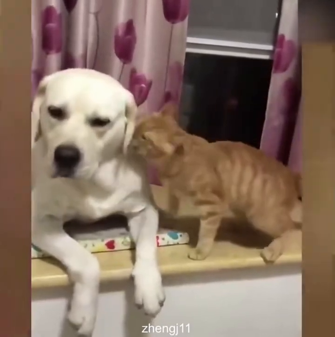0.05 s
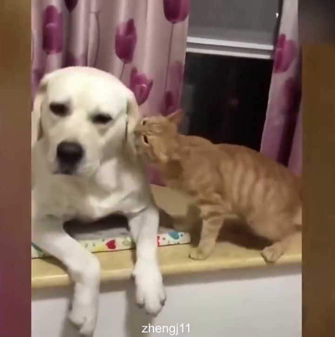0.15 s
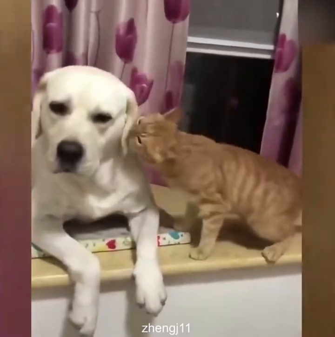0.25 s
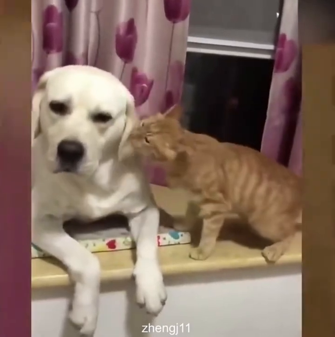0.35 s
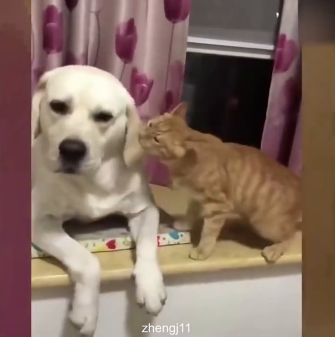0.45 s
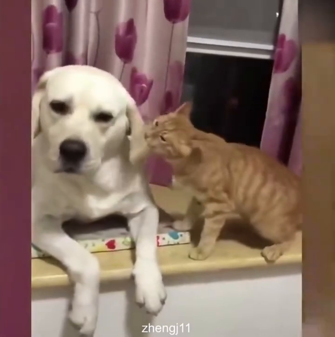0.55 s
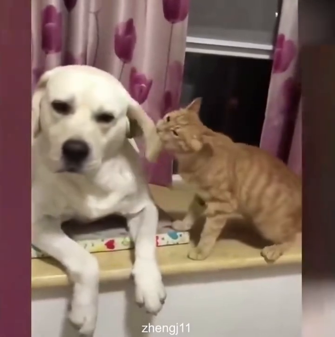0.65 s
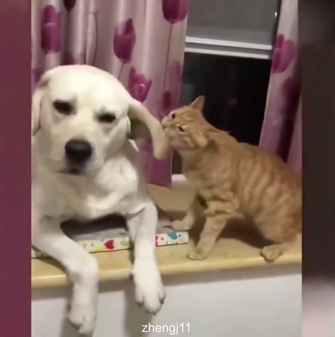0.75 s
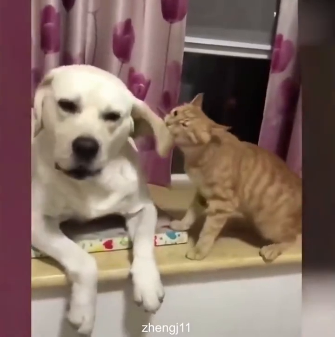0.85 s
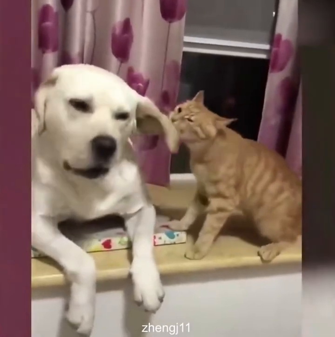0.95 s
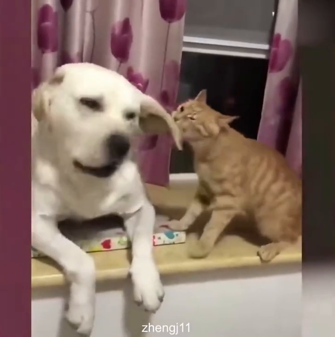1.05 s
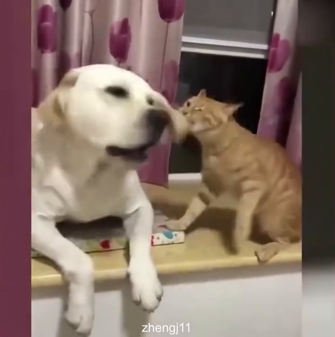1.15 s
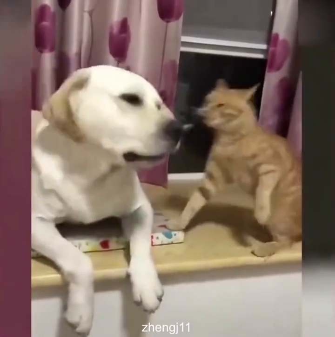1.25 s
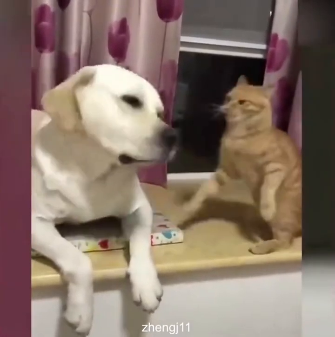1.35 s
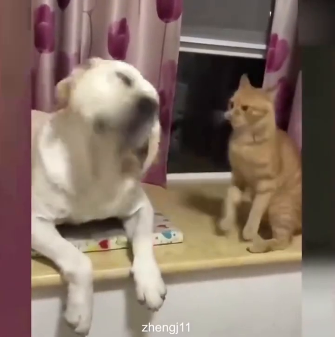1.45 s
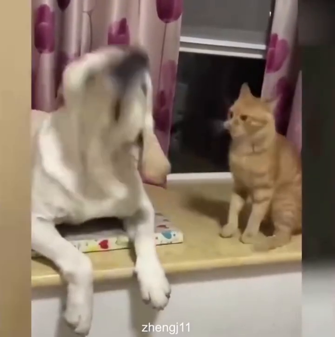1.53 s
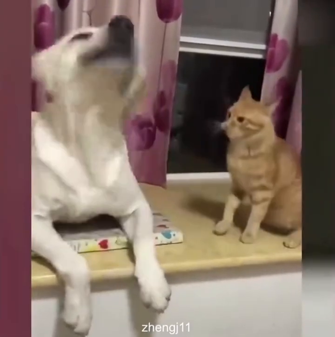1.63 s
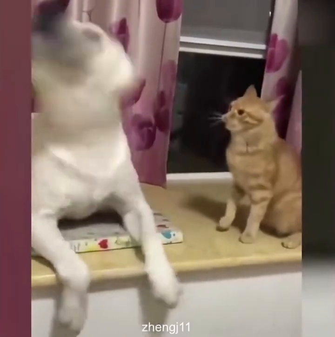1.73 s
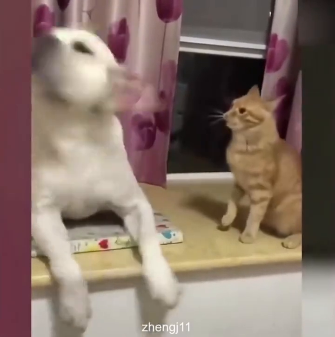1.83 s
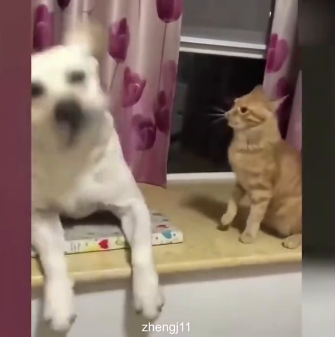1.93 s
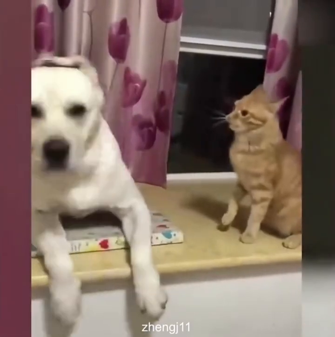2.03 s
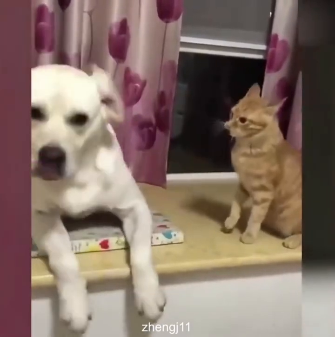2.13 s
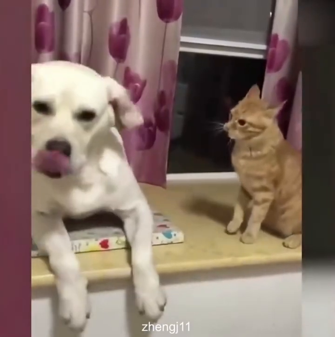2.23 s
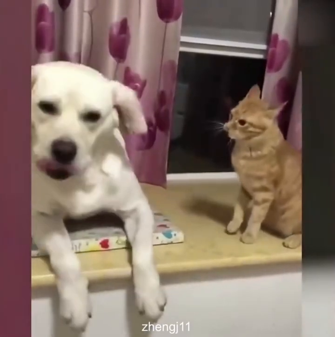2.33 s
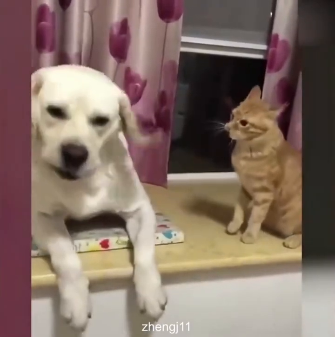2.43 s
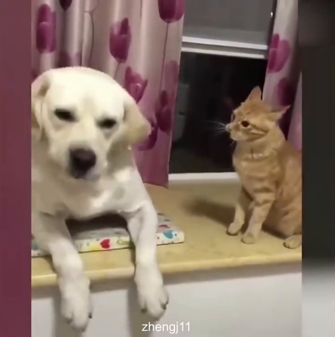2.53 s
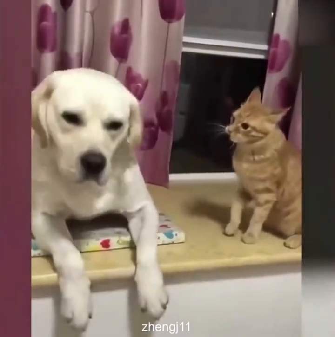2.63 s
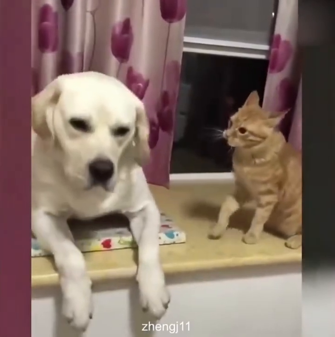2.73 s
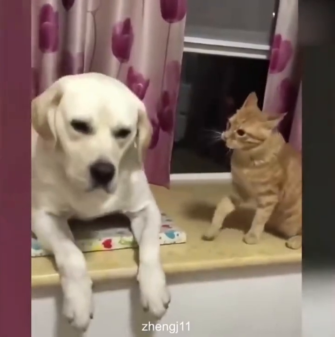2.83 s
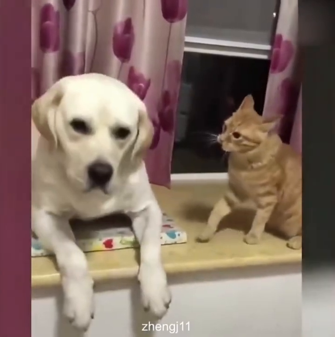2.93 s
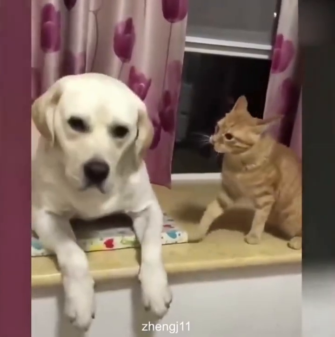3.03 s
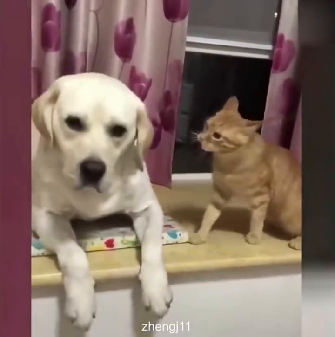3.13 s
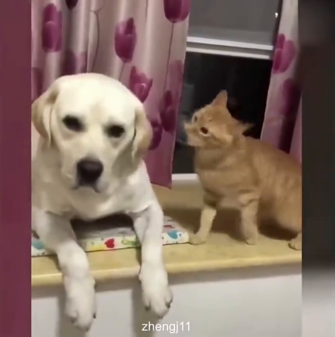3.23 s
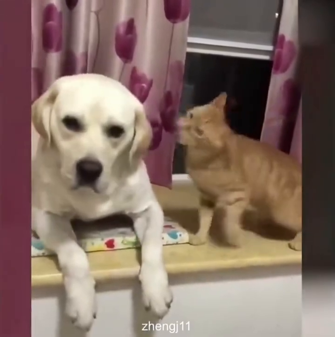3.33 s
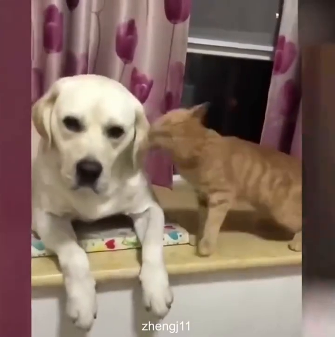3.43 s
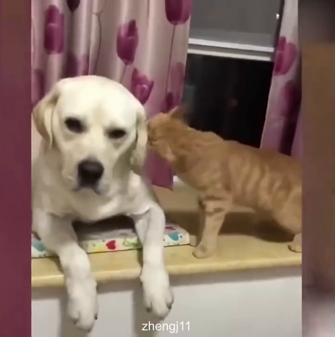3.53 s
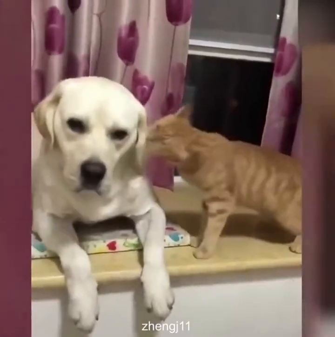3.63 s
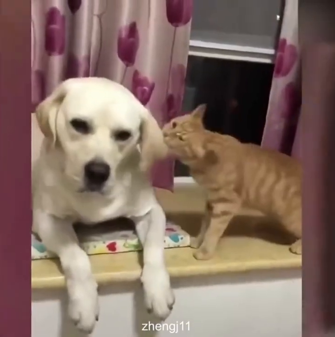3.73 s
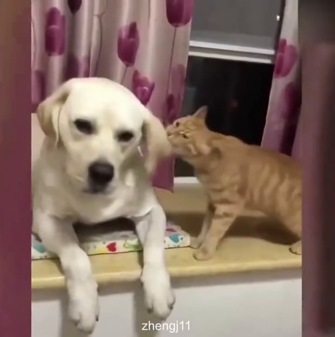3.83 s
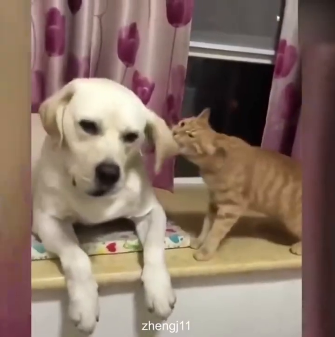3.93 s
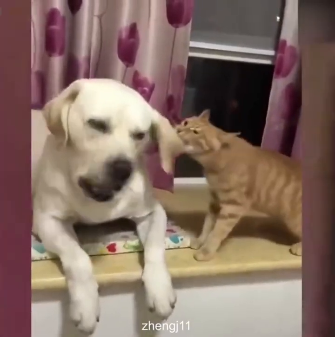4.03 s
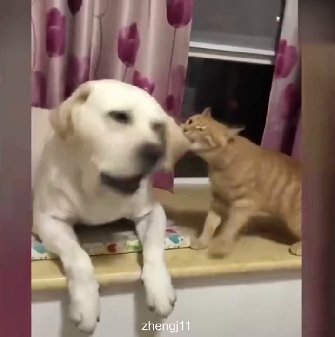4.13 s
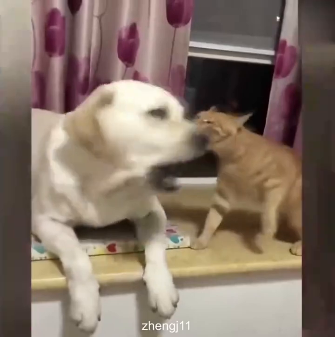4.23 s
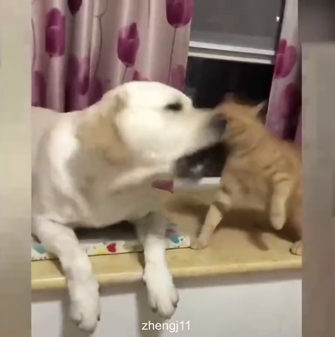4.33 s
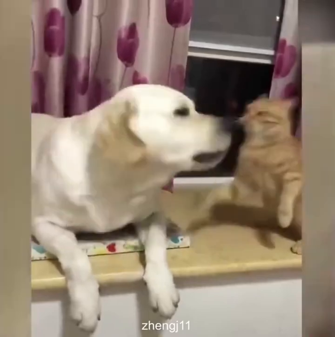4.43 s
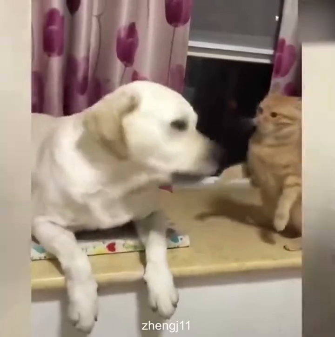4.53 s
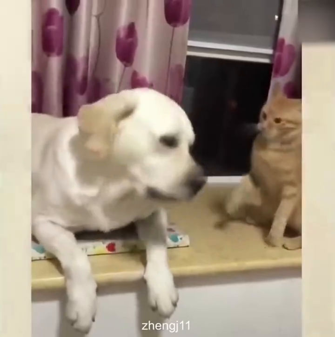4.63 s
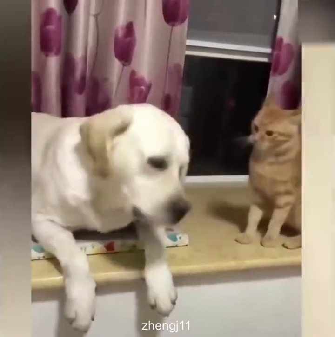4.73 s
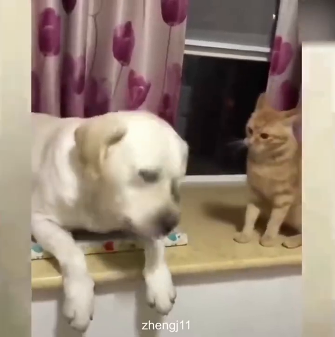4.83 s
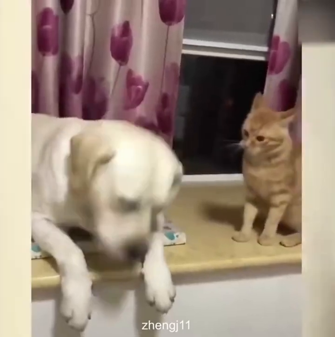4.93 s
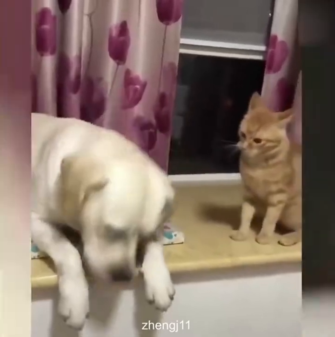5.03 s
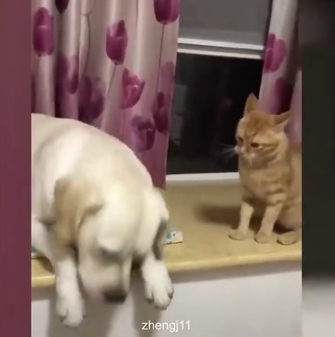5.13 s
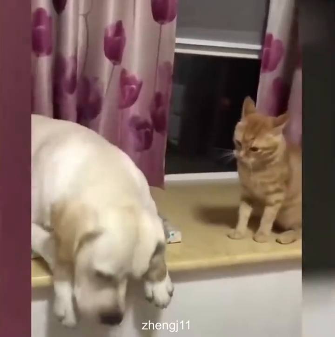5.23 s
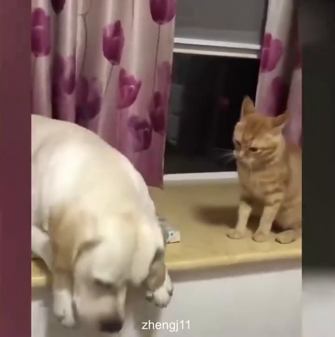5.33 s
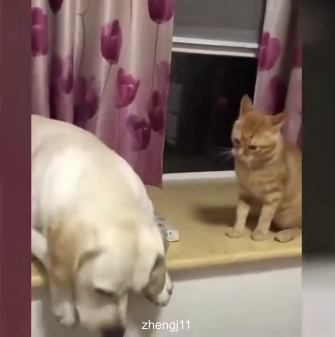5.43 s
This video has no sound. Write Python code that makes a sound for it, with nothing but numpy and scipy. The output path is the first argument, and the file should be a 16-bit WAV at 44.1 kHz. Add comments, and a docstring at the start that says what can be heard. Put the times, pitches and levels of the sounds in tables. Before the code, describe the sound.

In a small reflective room, a dog close to a phone whines with thin high nose whistles, rising into a sharp yelp. A short whine drops to a whimper, then ears and jowls flap softly. After a quiet stretch with faint sniffles, it huffs, gives two loud yelps in quick succession, and ends with a wavering closed-mouth whimper.

```python
"""A small hard-walled room: a dog, pestered by a cat, whines, whistles through its nose and yelps.
Cries stack ragged overtones, half-pitch undertones and breath on a bending pitch; whistles are thin sines.
Between the two outbursts it shakes its head and licks its lips: short bursts of coloured noise.
Sniffles, a huff and room tone are shaped noise; noise echoes make the walls.
A phone close by squeezes the yelps with a fast limiter."""
import sys
import numpy as np
from scipy import signal
from scipy.fft import rfft, irfft, next_fast_len
from scipy.io import wavfile
from scipy.ndimage import uniform_filter1d, minimum_filter1d, map_coordinates

SR = 44100
rng = np.random.default_rng(int(sys.argv[2]) if len(sys.argv) > 2 else 0)


def unload_audio(sound):
    """Save the sound as a 16-bit wav file, at the path given as the first command line argument."""
    columns = np.transpose(np.atleast_2d(sound))
    # keep every value between -1 and 1, then stretch to whole-number steps
    steps = np.round(np.clip(columns, -1, 1) * 32767)
    wavfile.write(sys.argv[1], SR, steps.astype(np.int16))


N = 241578
TOP_HZ = 14000  # nothing sounds above this
PURITY = 0.93  # dB the overtones lose, against the fundamental, per dB of swell

# overtone strength of a cry heard through the nose: (f/Hz, level against the fundamental/dB)
NOSE_TONE = [(500, -9), (1150, -3.5), (1700, -17.5), (2300, -20), (3200, -17), (4100, -20.5), (5100, -20.5),
             (6200, -29.5), (7200, -38.5), (8200, -36), (9600, -43.5), (11000, -37.5), (13500, -42.5)]


def amp(db):
    """Decibels to gain."""
    return 10 ** (np.asarray(db) / 20)


def unit(x):
    """Scaled to rms 1."""
    return x / np.sqrt(np.mean(x ** 2) + 1e-20)


def along(points, hz):
    """(Hz, value) points read on a log frequency axis."""
    f, v = np.transpose(points)
    return np.interp(np.log(hz + 1), np.log(f + 1), v)


def wobble(size, rate):
    """A smooth random curve with rate knots a second."""
    knots = rng.standard_normal(int(size * rate / SR) + 4)
    return map_coordinates(knots, [np.arange(size) * rate / SR])


def filtered(x, response):
    """x shaped by a gain that depends on frequency."""
    size = x.shape[-1]
    padded = next_fast_len(size + 4096)
    spectrum = rfft(x, padded) * response(np.fft.rfftfreq(padded, 1 / SR))
    return irfft(spectrum, padded)[..., :size]


def noise(spectrum, size):
    """Coloured noise of rms 1."""
    return unit(filtered(rng.standard_normal(size), lambda hz: amp(along(spectrum, hz))))


def add(track, s, x):
    """Mix x into the track from time s."""
    part = track[max(round(s * SR), 0):][:len(x)]
    part += x[:len(part)]


def clock(length):
    """The sample times of an event."""
    return np.arange(max(int(length * SR), 8)) / SR


def joined(t, times, values):
    """Straight lines between the stages of an event."""
    return np.interp(t, np.maximum.accumulate(times), values)


def soft_gate(size, fade):
    """Open for size samples, with rounded edges."""
    t = np.arange(size) / SR
    from_edge = np.minimum(t, t[-1] - t)
    return np.sin(np.pi / 2 * np.clip(from_edge / fade, 0, 1)) ** 2


def bend(t, first, middle, last):
    """One smooth scoop or arch of pitch."""
    u = 2 * t / t[-1] - 1
    return middle + (last - first) / 2 * u + ((first + last) / 2 - middle) * u ** 2


def envelope(t, attack, release, edge_db, fade_db):
    """Attack, hold and release in dB, tilted by a steady fade over the whole event."""
    shape_db = joined(t, [0, attack, t[-1] - release, t[-1]], [-edge_db, 0, 0, -edge_db])
    return shape_db - fade_db * (t / t[-1] - .5)


def room_tone():
    """The room's quiet coloured noise: steady, then sinking."""
    # colour of the hush: (f/Hz, relative level/dB)
    hush_color = [(15, -50.5), (25, -14.5), (54, -5), (91, -8), (271, -7.5), (425, -17), (569, -14),
                  (703, -22), (1160, -21.5), (2140, -30.5), (4730, -35), (12300, -41), (14000, -43.5)]
    # loudness of the hush: (t/s, level/dB)
    hush_level = [(4.6, -64.5), (4.75, -70.5)]
    level_db = joined(np.arange(N) / SR, *np.transpose(hush_level))
    return amp(level_db) * noise(hush_color, N)


def whistle(swing, sideband_db=36, octave_db=-31, jitter=0.0036, waver=.005, air_db=-31, flutter_db=2.07):
    """A thin second tone; when the folds swing too they chop it into sidebands, coloured by the nose."""
    # nasal whistles: (start t/s, length t/s, first f/Hz, middle f/Hz, last f/Hz, level/dB, fade/dB)
    whistle_notes = [(0.593, 0.042, 4640, 4630, 4960, -47, -5), (.677, 0.04, 4340, 4210, 4237, -31, -7.5),
                     (0.912, .1, 4154, 4043, 4276, -33, -3), (1.11, 0.021, 4560, 4803, 4680, -40, 2.5),
                     (1.205, 0.061, 4100, 4180, 4110, -32, -2), (1.448, 0.16, 4260, 4378, 4500, -36, 4.5),
                     (1.644, 0.1, 4258, 4150, 4290, -35.5, 0.5),
                     (2.647, 0.066, 4710, 4640, 4554, -44, -2.5),
                     (2.703, 0.14, 4660, 4518, 4574, -48, -2.5), (2.82, .215, 4490, 4486, 4484, -46.5, 7),
                     (4.415, .034, 4660, 4668, 4620, -24.5, 0.5),
                     (4.63, 0.083, 4480, 4477, 4580, -35.5, -7.5),
                     (4.695, 0.09, 4600, 4504, 4355, -39, 5.5),
                     (4.816, 0.11, 4095, 4117, 4070, -45.5, -8.5),
                     (5.425, 0.024, 4230, 4240, 4290, -54.5, -1.5)]
    # hiss around a whistle: (f/Hz, relative level/dB)
    hiss_color = [(1000, -11.5), (3000, 2), (5000, -3.5), (8000, -3), (11000, -9.5), (13500, -25.5)]
    sound = np.zeros(N)
    for start, length, first, middle, last, level_db, fade_db in whistle_notes:
        t = clock(length)
        size = len(t)
        gate = soft_gate(size, fade=.005)
        pitch = bend(t, first, middle, last) * (1 + waver * wobble(size, 45))
        db = level_db + envelope(t, attack=.0075, release=.017, edge_db=11, fade_db=fade_db)
        db = db + flutter_db * wobble(size, 50)
        phase = 2 * np.pi * np.cumsum(pitch * (1 + jitter * wobble(size, 300))) / SR
        tone = np.sin(phase) + amp(octave_db) * np.sin(2 * phase)
        hiss = amp(air_db) * noise(hiss_color, size)
        add(sound, start, np.sqrt(2) * gate * amp(db) * (tone + hiss))
    sidebands = filtered(sound * swing, lambda hz: amp(sideband_db + 2 * along(NOSE_TONE, hz)))
    return sound + sidebands


def voice(calls, tract, shimmer_db, air_db, bite_db, bite_time=0.026):
    """Vocal folds heard through the nose or mouth; also returns the folds' swing."""
    sound, swing = np.zeros(N), np.zeros(N)
    for start, pitch, db, bright_db, half_db in calls:
        size = len(pitch)
        gate = soft_gate(size, fade=.005)
        phase = 2 * np.pi * np.cumsum(pitch * (1 + .005 * wobble(size, 300))) / SR
        # strained folds close a little early or late each cycle, which tears the high overtones into rasp
        slip = np.interp(half_db, [-48, -30], [.08, .16]) * wobble(size, 700)
        # extra edge on the upper overtones, greatest bite_time seconds into the cry
        age = np.arange(size) / SR / bite_time
        bite = bite_db * age ** 2 * np.exp(1 - age ** 2)
        wave = np.sin(phase)
        for k in range(2, 20):
            # each upper overtone swells and fades at random, on its own
            ragged_db = min(2 * k - 3, 5) * wobble(size, 45)
            overtone_db = along(tract, k * pitch) + bright_db + ragged_db + bite * (k > 3)
            overtone = amp(overtone_db) * np.sin(k * phase + (k - 1) * slip)
            wave += overtone * (k * pitch < TOP_HZ)
        # under strain every second cycle differs, which puts lines halfway between the harmonics
        for k in np.arange(10) + .5:
            wave += amp(along(tract, k * pitch) + half_db) * np.sin(k * (phase + slip))
        # air escapes in a puff each cycle
        air = amp(air_db + bright_db) * noise(tract, size) * (1 + np.cos(phase))
        level = amp(db + shimmer_db * wobble(size, 120))
        add(sound, start, gate * level * (np.sqrt(2) * wave + air))
        add(swing, start, gate * np.cos(phase))
    return sound, swing


def short_cry(row):
    """Start, pitch, level, overtones and undertone of one bend of pitch; higher is louder and purer."""
    start, length, first, middle, last, db, fade_db, bright_db, half_db = row
    t = clock(length)
    pitch = bend(t, first, middle, last)
    effort_db = 11 * np.log2(pitch / middle)  # 11 dB an octave
    shape_db = envelope(t, attack=.014, release=.025, edge_db=11.5, fade_db=fade_db)
    return start, pitch, db + effort_db + shape_db, bright_db - PURITY * effort_db, half_db


def long_cry(curve, gain_db, overtones_db, undertone_db):
    """The same controls for a wavering cry, which grows purer as it swells."""
    s, hz, level = np.transpose(curve)
    t = s[0] + clock(s[-1] - s[0])
    db = joined(t, s, level)
    bright_db = overtones_db - PURITY * (db - db.mean())
    return s[0], joined(t, s, hz), db + gain_db, bright_db, undertone_db


def whimpers():
    """Closed-mouth whimpers: two short bends of pitch and one long, wavering cry."""
    # short whimpers: (start t/s, length t/s, first f/Hz, middle f/Hz, last f/Hz,
    #                  level/dB, fade/dB, overtones/dB, half-pitch undertone/dB)
    short_rows = [(0.624, .055, 694, 740.3, 770, -58, 0, 0, -38),
                  (1.742, .068, 762, 605, 456.8, -36, 0.0046, -8, -21)]
    # the long whimper: (t/s, f/Hz, level/dB)
    long_curve = [(4.905, 829, -53), (4.955, 749, -49), (5.0, 670.3, -49), (5.02, 651, -65.5),
                  (5.05, 642.7, -44.5), (5.1, 642, -46.5), (5.16, 636, -33), (5.195, 605, -40.5),
                  (5.23, 579, -63.5)]
    # overtone strength behind closed lips: (f/Hz, level against the fundamental/dB)
    closed_tone = [(500, -3), (1250, -19), (1550, -17), (1950, -27), (2600, -20.5), (3300, -8.5),
                   (3900, -21.5), (4600, -16.5), (6200, -38), (8000, -37), (13000, -40)]
    long_whimper = long_cry(long_curve, gain_db=0.0, overtones_db=-8, undertone_db=-45)
    calls = [*map(short_cry, short_rows), long_whimper]
    return voice(calls, closed_tone, shimmer_db=-0.03, air_db=-29.5, bite_db=1.5)[0]


def whines():
    """Nasal whines, two short and one long and wavering, with the folds' swing."""
    # short whines: (start t/s, length t/s, first f/Hz, middle f/Hz, last f/Hz,
    #                level/dB, fade/dB, overtones/dB, half-pitch undertone/dB)
    short_rows = [(0.706, .205, 750, 559.8, 782.4, -38.5, 6.5, -1, -37.5),
                  (1.394, .17, 1221, 1287, 1214, -30.5, 17, -4, -30)]
    # the long whine: (t/s, f/Hz, level before its gain/dB)
    long_curve = [(1.008, 1122, -33), (1.02, 861, -30.5), (1.037, 820, -31.5), (1.062, 1071, -32),
                  (1.1, 1038, -29), (1.122, 1216, -26), (1.137, 1070, -21), (1.157, 1069, -11.5),
                  (1.177, 1092, -31), (1.21, 1178, -28), (1.265, 1214, -30.5)]
    long_whine = long_cry(long_curve, gain_db=-0.5, overtones_db=0, undertone_db=-30)
    calls = [*map(short_cry, short_rows), long_whine]
    return voice(calls, NOSE_TONE, shimmer_db=2.92, air_db=-32, bite_db=-0.5)


def yelp(row, pitch_curve):
    """The same controls for a yelp: it starts softly, bursts out, holds, then cracks into a weaker end."""
    # level at the start and end of the lead-in: (level/dB, level/dB)
    lead_in_db = (-31.5, -21.5)
    crack_s, release_s, release_db = 0.019, 0.026, 11.5
    sag_db, dulling_db = 3.5, 4  # losses of level and of overtones over the hold
    (start, length, lead_in, attack, crack, full_db, cracked_db,
     burst_bright_db, cracked_bright_db, half_db, rasp_db) = row
    t = clock(length)
    burst, cracked = lead_in + attack, crack + crack_s
    # 72 % of the rise in dB is done halfway through the attack
    halfway_db = lead_in_db[1] + .72 * (full_db - lead_in_db[1])
    times = [0, lead_in, lead_in + attack / 2, burst, crack, cracked, length - release_s, length]
    levels = [*lead_in_db, halfway_db, full_db, full_db - sag_db,
              cracked_db, cracked_db, cracked_db - release_db]
    bright_db = joined(t, [burst, crack, cracked],
                       [burst_bright_db, burst_bright_db - dulling_db, cracked_bright_db])
    # the undertone needs up to 80 ms to build from nearly clean
    undertone_db = joined(t, [0, min(.08, crack), crack, cracked], [-45.5, half_db, half_db, rasp_db])
    pitch = joined(start + t, *np.transpose(pitch_curve))
    return start, pitch, joined(t, times, levels), bright_db, undertone_db


def yelps():
    """Open-mouthed yelps whose pitch dips as the mouth opens and climbs as it closes."""
    # yelps: (start t/s, length t/s, lead-in t/s, attack t/s, crack after t/s, full level/dB, cracked level/dB,
    #         burst overtones/dB, cracked overtones/dB, full undertone/dB, cracked undertone/dB)
    yelp_rows = [(1.262, 0.13, .002, .022, .08, 0.5, -13, 1.5, 5, -42, -32),
                 (4.254, 0.15, .025, 0.0025, .06, 5.5, -11.5, -1, 1.5, -39.5, -25),
                 (4.446, 0.18, .003, 0.035, .128, -3, -16.5, 2, 2, -16.5, -31.5)]
    # one pitch curve a yelp: (t/s, f/Hz)
    pitch_curves = [
        [(1.263, 1024), (1.277, 942.7), (1.297, 902.3), (1.311, 824.8), (1.325, 907.3), (1.342, 885.3),
         (1.36, 1008), (1.4, 1233)],
        [(4.255, 1049), (4.266, 752.5), (4.279, 693), (4.281, 840.4), (4.297, 778.6), (4.316, 845),
         (4.328, 980.3), (4.355, 1093), (4.402, 1200)],
        [(4.448, 1211), (4.473, 1004), (4.488, 994), (4.502, 936.2), (4.56, 920.7), (4.58, 979.4),
         (4.597, 1125), (4.625, 1200)],
    ]
    # overtone strength through the open mouth: (f/Hz, level against the fundamental/dB)
    mouth_tone = [(450, -17), (900, 1.5), (1400, -1), (1850, -9), (2300, -22), (2900, -22), (3700, -35),
                  (4800, -39.5), (5900, -47), (7100, -38), (8300, -38), (9400, -47), (11000, -54.5),
                  (13500, -62)]
    calls = map(yelp, yelp_rows, pitch_curves)
    return voice(calls, mouth_tone, shimmer_db=3.0, air_db=-38.0, bite_db=7.5)[0]


def rumble(yelp_sound, rumble_db):
    """A faint low rumble that rises and falls with the yelps."""
    # colour of the rumble: (f/Hz, relative level/dB)
    rumble_color = [(20, -2.5), (70, 0), (160, -1.5), (300, -14), (600, -40.5)]
    loudness = uniform_filter1d(np.abs(yelp_sound), size=400)
    return amp(rumble_db) * np.abs(loudness) ** .5 * noise(rumble_color, N)


def airflow(rows, spectrum, flutter_db, swell_db):
    """Fluttering rushes of air or fur that swell and die away."""
    sound = np.zeros(N)
    for start, length, peak_db in rows:
        t = clock(length)
        db = peak_db - swell_db * (2 * t / t[-1] - 1) ** 2 + flutter_db * wobble(len(t), 77)
        add(sound, start, soft_gate(len(t), fade=.01) * amp(db) * noise(spectrum, len(t)))
    return sound


def fur_shake():
    """Fur swishing as the head shakes: one swell of fluttering noise."""
    # the swish: (start t/s, length t/s, mid-swell level before flutter/dB)
    swish = [(1.92, .38, -53)]
    # colour of the fur: (f/Hz, relative level/dB)
    fur_color = [(100, 0.5), (220, 6), (400, -6.5), (700, 3.5), (1000, -9.5), (2000, -7), (3500, -12.5),
                 (13000, -24)]
    return airflow(swish, fur_color, flutter_db=4.0, swell_db=22.5)


def flaps(click_share=0.55):
    """Soft slaps of ears and jowls, each a decaying noise burst with a shorter wet click."""
    # ear flaps and lip smacks: (t/s, slap level/dB, wet click level/dB, slap t60 t/s)
    hits = [(1.951, -53, -47, .07), (1.996, -43, -70.5, 0.089), (2.052, -43, -40, .019),
            (2.061, -36.5, -48, 0.087), (2.093, -34, -46.5, .04), (2.102, -34.5, -66, 0.053),
            (2.151, -37.5, -35.5, .05), (2.239, -48, -63.5, 0.061), (2.294, -57, -60.5, .072),
            (2.595, -66, -47.5, 0.048)]
    # colour of the slap: (f/Hz, relative level/dB)
    slap_color = [(47, -45.5), (80, -21), (220, -5.5), (299, -9), (662, -4.5), (779, -14.5), (1270, -10),
                  (2260, -18.5), (3080, -24), (6000, -49), (7800, -48), (13200, -120)]
    # colour of the wet click: (f/Hz, relative level/dB)
    smack_color = [(500, -37.5), (2000, -13), (4000, -2.5), (6500, -3.5), (9000, -11.5), (13500, -13.5)]
    sound, t = np.zeros(N), np.arange(SR // 5) / SR
    for s, slap_db, click_db, t60 in hits:
        slap = amp(slap_db - 60 * t / t60) * noise(slap_color, len(t))
        click = amp(click_db - 60 * t / (click_share * t60)) * noise(smack_color, len(t))
        add(sound, s, slap + click)
    return sound


def sniffles():
    """Faint air through the nose, which colours the noise."""
    # sniffles: (start t/s, length t/s, mid-swell level before flutter/dB)
    sniffs = [(2.5, 0.74, -71), (3.03, 0.24, -70), (4.88, 0.96, -68.5), (5.19, 0.17, -62.5)]
    # colour of the nose air: (f/Hz, relative level/dB)
    sniff_color = [(1200, -21), (2200, -14), (2800, 10), (3600, -3), (4400, 9), (5500, -13), (12000, -34)]
    return airflow(sniffs, sniff_color, flutter_db=2.5, swell_db=12.5)


def huff():
    """The dog's huff before the second outburst of yelps: one steep swell of breath noise."""
    # the huff: (start t/s, length t/s, mid-swell level before flutter/dB)
    puff = [(4.045, 0.24, -42.5)]
    # colour of the breath: (f/Hz, relative level/dB)
    huff_color = [(88, -55.5), (150, -18.5), (268, -5), (435, -13), (544, -2), (836, -10.5), (1380, 0),
                  (1640, -17), (1940, -5.5), (3090, -8.5), (3790, -16.5), (5210, -17), (13000, -48.5)]
    return airflow(puff, huff_color, flutter_db=2.5, swell_db=29.5)


def scatter(x, t60=.07):
    """Quick reflections from sill and window make gliding overtones swell and fade."""
    # colour of the near reflections: (f/Hz, level/dB)
    near_color = [(900, -29), (1900, -13), (3200, -7), (7000, 0.5)]
    t = np.arange(SR // 10) / SR
    burst = rng.standard_normal(len(t)) * amp(-60 * t / t60)
    burst = filtered(burst / np.linalg.norm(burst), lambda hz: amp(along(near_color, hz)))
    return signal.fftconvolve(x, burst)[:N]


def room(x, build=0.0014):
    """The walls' answer builds up over the first bounces, then each frequency dies at its own speed."""
    # decay of the reverberation: (f/Hz, t60 t/s)
    decay = [(150, .4), (600, .5), (1100, 0.33), (2000, 0.38), (4500, 0.37), (8000, 0.28), (13000, 0.52)]
    # colour of the reverberation, strongest near 1250 Hz, weaker around 900 and 8000 Hz: (f/Hz, level/dB)
    wet_color = [(500, -10), (930, -13.5), (1250, -5), (2000, -8), (4500, -8), (8000, -14), (13000, -8)]
    hz, t, z = signal.stft(rng.standard_normal(SR * 3 // 4), SR, nperseg=256)
    dying = amp(-60 * t / along(decay, hz)[:, None])
    rising = 1 - np.exp(-(t / build) ** 2)
    tail = signal.istft(z * dying * rising, SR, nperseg=256)[1]
    tail = filtered(tail / np.linalg.norm(tail), lambda hz: amp(along(wet_color, hz)))
    return signal.fftconvolve(x, tail)[:N]


def scene():
    """The dog straight ahead; mostly the treble of the room spreads sideways."""
    # stereo width of the reverberation: (f/Hz, side gain/dB)
    width = [(2500, -68), (4500, -33.5), (6000, -3.5), (12000, -7)]
    whine_sound, swing = whines()
    yelp_sound = yelps()
    cries = whine_sound + yelp_sound + whimpers()
    air = sniffles() + huff()
    head_shake = flaps() + fur_shake()
    dog = cries + scatter(cries) + whistle(swing) + air + head_shake
    mid = dog + room(dog) + rumble(yelp_sound, rumble_db=-46) + room_tone()
    side = filtered(room(dog), lambda hz: amp(along(width, hz)))
    return np.array([mid + side, mid - side])


def record(dry, hold=0.0022, lopsided=0.0025):
    """A fast limiter that reacts a moment late, so sudden peaks clip; then the phone's band limit."""
    needed = np.minimum(1, .84 / (np.abs(dry).max(axis=0) + 1e-9))
    size = max(int(hold * SR), 2)
    gain = uniform_filter1d(minimum_filter1d(needed, size), size)
    late_gain = np.roll(gain, size // 2)
    held = np.clip(dry * late_gain, -.97, .97)
    # the squared term adds a trace of even-harmonic distortion
    return filtered(held + lopsided * held ** 2, lambda hz: hz < TOP_HZ)


dry = scene()
out = record(dry)
unload_audio(out)
```